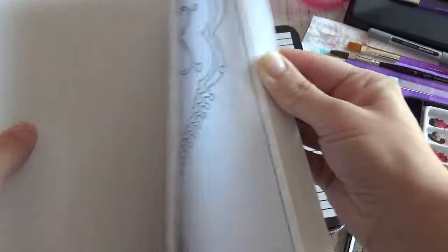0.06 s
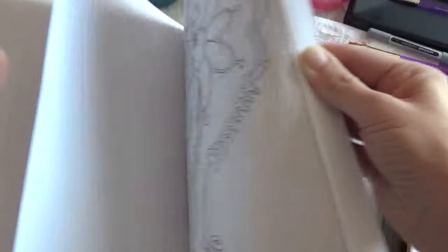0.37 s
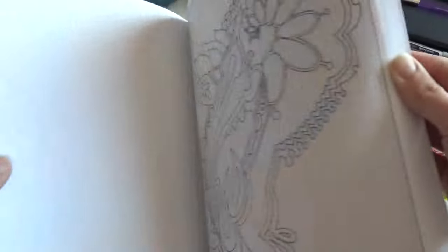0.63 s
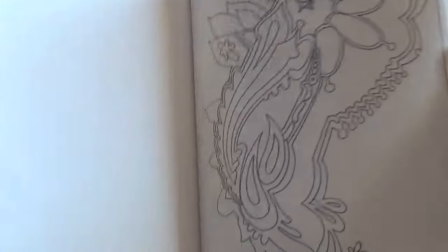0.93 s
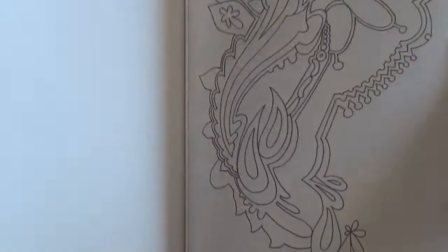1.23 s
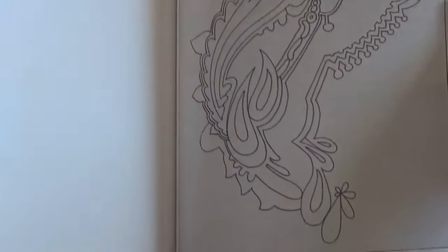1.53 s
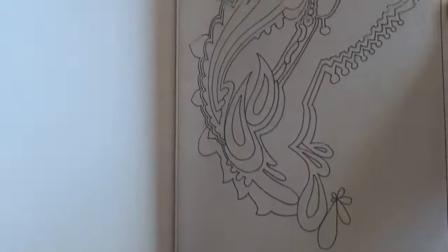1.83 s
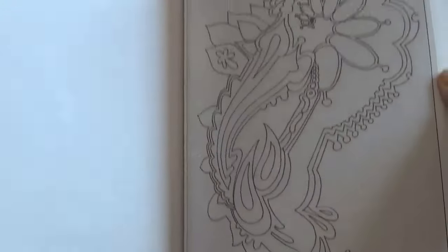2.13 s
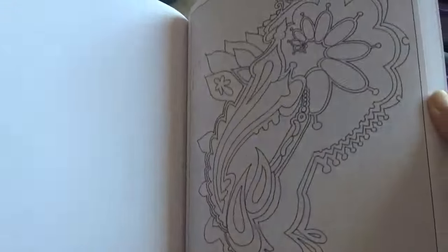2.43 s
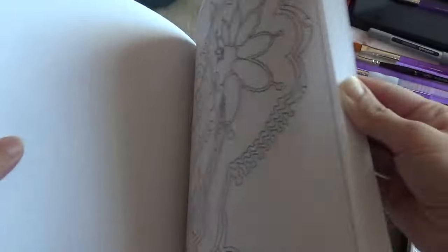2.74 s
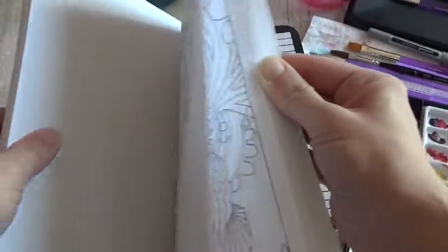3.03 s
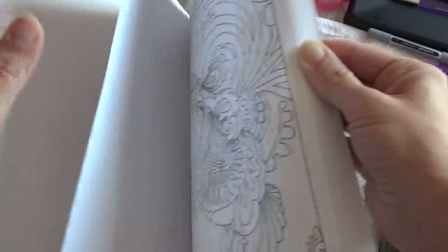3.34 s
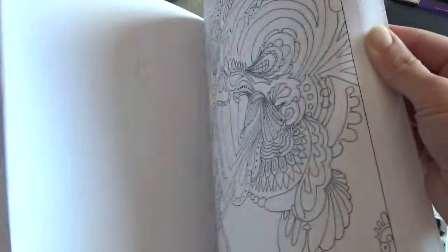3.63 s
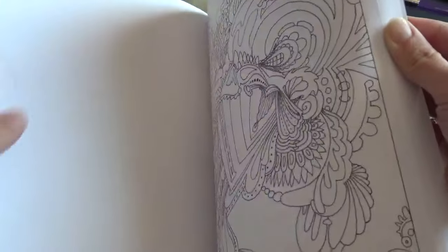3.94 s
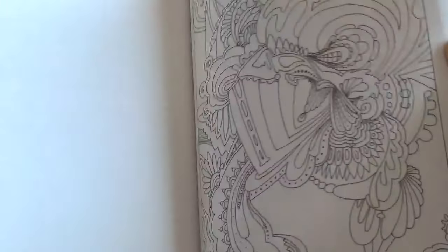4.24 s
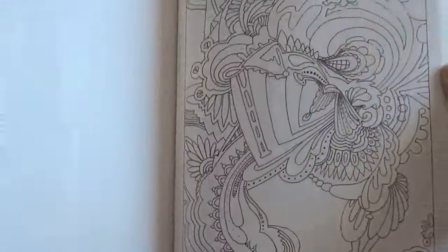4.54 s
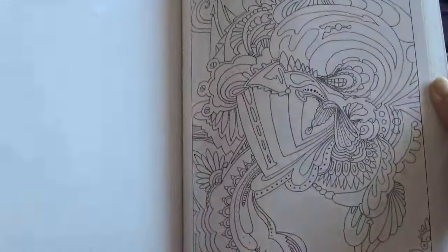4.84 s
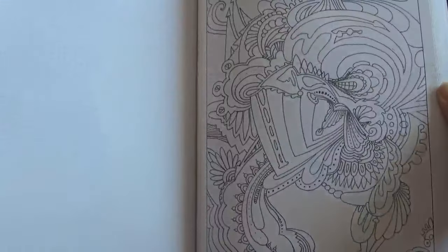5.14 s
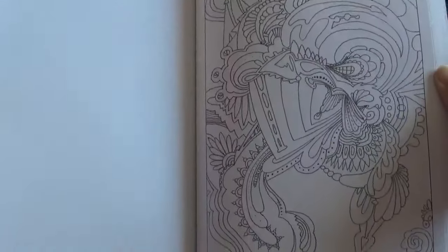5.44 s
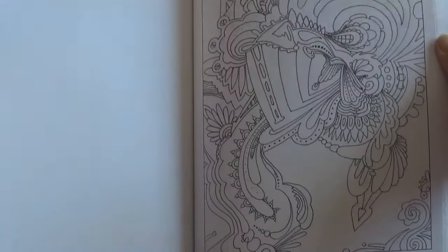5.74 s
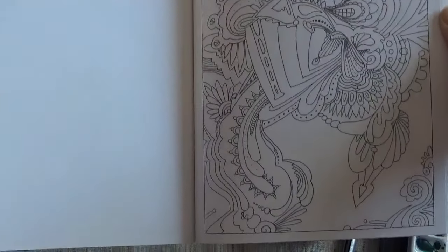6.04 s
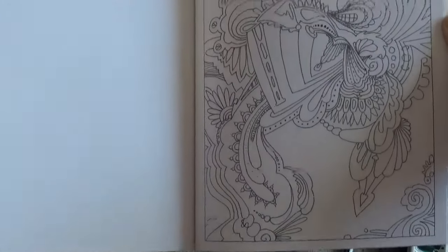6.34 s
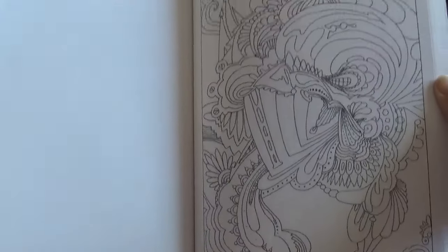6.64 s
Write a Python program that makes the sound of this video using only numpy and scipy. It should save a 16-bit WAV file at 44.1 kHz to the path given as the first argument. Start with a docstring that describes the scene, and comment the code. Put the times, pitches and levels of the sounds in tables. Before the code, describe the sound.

Two thick pages of a drawing book are turned by hand, close to the microphone in a small quiet room. A light brush leads into a sharp snap and brief rustle. After a pause come a soft tap and faint sliding, then the second page turns with a gentler snap and rustle, and settles. Low room hiss and a faint, rapid electrical chirping continue throughout.

```python
"""Turning the pages of a drawing book

Two thick pages are turned by hand, close to a phone in a small quiet room. Each sheet slips off the
thumb, buckles with a snap and slides over its neighbour, where friction excites a rustle; fingers brush
and tap the paper. Beneath lie room hiss and faint electrical interference, chirping 30 times a second."""
import sys
import numpy as np
from scipy import signal
from scipy.fft import rfft, irfft
from scipy.io import wavfile

SR = 44100
rng = np.random.default_rng(int(sys.argv[2]) if len(sys.argv) > 2 else 0)


def transcribe(signal):
    """Save signal, clipped to [-1, 1], as a 16-bit WAV file at the path in sys.argv[1]."""
    frames = np.atleast_2d(signal).T
    limited = np.clip(frames, -1, 1)
    pcm = np.round(limited * 32767).astype(np.int16)
    wavfile.write(sys.argv[1], SR, pcm)


N = 294588
TIME = np.arange(N) / SR
FREQ = np.maximum(np.arange(N // 2 + 1) * SR / N, 1)


def undb(db):
    """Amplitude ratio of a level in decibels."""
    return 10 ** (np.asarray(db) / 20)


def unit(x):
    """Normalisation to rms 1."""
    return x / np.sqrt(np.mean(x ** 2))


def spectrum(points):
    """Spectral envelope through (frequency_hz, level_db) points."""
    hz, db = np.transpose(points)
    return undb(np.interp(np.log(FREQ), np.log(hz), db))


def resonance(hz, width_hz):
    """Frequency response of a damped oscillator, gain 1 at its centre."""
    return 1 / (1 + 1j * (FREQ ** 2 - hz ** 2) / (FREQ * width_hz))


def noise(colour):
    """Filtered Gaussian noise of rms 1."""
    return unit(irfft(rfft(rng.standard_normal(N)) * colour, N))


def add(out, start_s, sound):
    """Superposition of a sound from a given time."""
    i = max(int(start_s * SR), 0)
    out[i:i + len(sound)] += sound[:max(N - i, 0)]


def envelope(attack_s, hold_until_s, release_s):
    """Linear rise, plateau and exponential decay."""
    t = TIME[:min(int((hold_until_s + 6 * release_s) * SR), 16000)]
    return np.minimum(t / attack_s, 1) * np.exp(-np.maximum(t - hold_until_s, 0) / release_s)


def glide(length_s, first_hz, last_hz):
    """A linear frequency sweep that swells and fades."""
    count = max(int(length_s * SR), 16)
    phase = 2 * np.pi * np.cumsum(np.linspace(first_hz, last_hz, count)) / SR
    return np.hanning(count) * np.sin(phase)


def ring(modes):
    """Free vibration: a sum of exponentially damped modes."""
    t = TIME[:SR // 5]
    return sum(undb(db - 60 * t / t60_s) * np.sin(2 * np.pi * hz * t) for hz, db, t60_s in modes)


# Spectrum of the room hiss: frequency_hz, gain_db
HISS_SPECTRUM = [(15, -4.5), (25, -5.5), (42, 1), (62, -5.5), (95, -1), (230, -2.5), (305, -2), (430, -7),
                 (1100, -11), (2000, -14), (3200, -14), (4400, -16), (11000, -20)]
# Stereo width of the hiss: frequency_hz, side_to_mid_db
HISS_WIDTH = [(30, -23), (70, -17.5), (180, -10.5), (340, -5.5), (600, 0), (1100, 1), (2000, 0), (3500, -2),
              (6500, -6.5), (11000, -9)]
# Whirring of something electric: centre_hz, width_hz, level_db
WHIR_BANDS = [(1446, 97, -77.5), (1302, 40, -83), (313, 27, -81)]

def room_hiss(mid_db=-64):
    """Broadband noise, partly coherent between the channels, with narrow bands of whirring."""
    colour = spectrum(HISS_SPECTRUM)
    side_colour = colour * spectrum(HISS_WIDTH)
    side = noise(side_colour) * np.linalg.norm(side_colour) / np.linalg.norm(colour)
    whir = sum(undb(db) * noise(resonance(hz, width_hz) ** 2) for hz, width_hz, db in WHIR_BANDS)
    return undb(mid_db) * (noise(colour) + np.array([side, -side])) + whir


# Course of the electronic buzz: time_s, pitch_hz, gain_db
BUZZ_COURSE = [(0, 890, -2.5), (0.3, 860, -4), (0.5, 875, -3), (0.72, 861, -0.5), (0.95, 928, -1),
               (1.22, 1122, 2.5), (1.42, 1118, -10), (2.12, 1116, -6), (2.36, 1340, -2), (2.62, 1365, 1.5),
               (2.85, 1256, -7), (3.0, 1090, 1), (3.25, 957, -1), (4.3, 970, 0), (4.52, 1124, 1),
               (4.66, 1290, -8), (4.85, 1356, -2.5), (6.68, 1338, -2.5)]
# Overtone level set by the casing's two resonances: frequency_hz, level_db
CASING_RESPONSE = [(1900, -85), (2340, -71), (2620, -56.5), (2730, -63), (2880, -68.5), (3060, -66),
                   (3320, -56), (3510, -71), (4200, -89)]
# Blips around each burst: pitch_hz, lag_s, sigma_s, level_db
BLIPS = [(2483, -0.0022, 0.00047, -63.5), (3283, -0.003, 0.002, -64.5), (3715, -0.0047, 0.0014, -68.5),
         (2835, 0.0031, 0.00066, -63)]

def interference(rate_hz=29.965, burst_sigma_s=0.003, scatter_db=0.7, detune=0.003, swing_db=1.5):
    """Pulse modulation: bursts of a buzz, its overtones gliding through casing resonances, amid blips."""
    times, pitches, gains = np.transpose(BUZZ_COURSE)
    pitch = np.interp(TIME, times, pitches)
    cycle = np.round(TIME * rate_hz).astype(int)
    offset_s = TIME - cycle / rate_hz
    polarity = (-1) ** cycle
    pitch_jitter, level_jitter, blip_phase = rng.standard_normal((cycle[-1] + 1, 3))[cycle].T
    phase = 2 * np.pi * pitch * (1 + detune * pitch_jitter) * offset_s
    casing_hz, casing_db = np.transpose(CASING_RESPONSE)
    buzz = sum(undb(np.interp(k * pitch, casing_hz, casing_db)) * np.sin(k * phase) for k in (2, 3))
    buzz *= np.exp(-0.5 * (offset_s / burst_sigma_s) ** 2)
    buzz *= undb(np.interp(TIME, times, gains) + scatter_db * level_jitter)
    blips = np.zeros(N)
    for hz, lag_s, sigma_s, db in BLIPS:
        window = np.exp(-0.5 * ((offset_s - lag_s) / sigma_s) ** 2)
        blips += undb(db) * window * np.sin(2 * np.pi * hz * offset_s + blip_phase)
    swing = undb(swing_db * polarity)  # favours buzz and blips in turn
    return polarity * (buzz / swing + blips * swing)


def reflections(source):
    """Reverberation: bright early reflections off the desk, then a dull tail from the walls."""
    channels = []
    for _ in range(2):
        response = 0
        for delay_s, t60_s, db, cutoff_hz in [(0.001, 0.09, -17, 7000), (0.008, 0.22, -14, 3300)]:
            decay = rng.standard_normal(N) * undb(-60 * TIME / t60_s) * (TIME > delay_s)
            response += undb(db) * rfft(decay) / np.linalg.norm(decay) / (1 + 1j * FREQ / cutoff_hz)
        channels.append(irfft(rfft(source) * response, N))
    return np.array(channels)


def friction(count, colour, rate_hz, spread_db):
    """Shot noise: catching fibres give random, unequal impulses, filtered and scaled to rms 1."""
    size = 16384
    strength = undb(spread_db * np.minimum(rng.exponential(size=size), 4))
    clicks = (rng.random(size) < rate_hz / SR) * rng.choice([-1, 1], size) * strength
    gain = np.interp(np.fft.rfftfreq(size, 1 / SR), FREQ, np.abs(colour))
    return unit(irfft(rfft(clicks) * gain)[:count])


# Radiation of the fibres: frequency_hz, gain_db
FIBRE_SPECTRUM = [(2000, -8), (5000, 2), (6400, -1), (7200, -2), (10200, -5), (11200, -11.5)]

def fibre_hiss(count, centre_hz):
    """Direct radiation from the fibres: a fine sizzle in a broad treble band."""
    band = np.abs(resonance(centre_hz, width_hz=4000)) ** 2
    return friction(count, spectrum(FIBRE_SPECTRUM) * band, rate_hz=3100, spread_db=1.7)


# Radiation of the sheet: frequency_hz, gain_db
SHEET_SPECTRUM = [(60, -38), (250, -14.5), (600, -9.5), (1000, -0.5), (1600, -1.5), (2500, 1.5), (3600, 0),
                  (4600, -1.5), (5400, -5.5), (11000, -22)]

def sheet_rustle(count, tilt_db, echo, echo_s=0.00043):
    """Forced vibration: catching fibres shake the sheet, bright when taut and dull when slack."""
    octaves = np.log2(np.clip(FREQ, 500, None) / 2000)
    comb = 1 + echo * np.exp(-2j * np.pi * FREQ * echo_s)  # reflection off the facing page
    colour = spectrum(SHEET_SPECTRUM) * undb(tilt_db * octaves) * comb
    return friction(count, colour, rate_hz=3700, spread_db=-1.5)


# The slack sheet comes to rest: start_s, level_db
SETTLINGS = [(0.514, -44), (2.722, -62.5), (3.609, -55), (4.019, -58.5)]

def settling():
    """Friction under a decaying pressure: a dull, dying rustle."""
    out = np.zeros(N)
    for start_s, db in SETTLINGS:
        pressure = envelope(attack_s=0.0025, hold_until_s=0.0025, release_s=0.035)
        add(out, start_s, undb(db) * pressure * sheet_rustle(len(pressure), tilt_db=-8.5, echo=0.072))
    return out


# Paper slides on paper or skin:
# start_s, length_s, swell_db, sheet_db, tilt_db_per_octave, fibre_db, fibre_hz, echo_ratio
SLIDES = [(0.018, 0.093, 11.5, -59.5, -2, -63, 8300, 0.34), (0.467, 0.022, 14, -40, -4, -55, 8500, 0.6),
          (0.483, 0.020, 16.5, -38.5, -2, -40, 8250, 0.1), (0.507, 0.0057, 5, -26.5, 0, -36, 6970, 0.05),
          (0.712, 0.053, -3, -61.5, -2, -67, 8700, 0), (2.86, 0.22, -1, -69.5, -6.5, -73, 8040, 0.4),
          (3.018, 0.048, 3, -65, 3, -72, 7800, 0.3), (3.081, 0.045, 3, -65, -1, -61, 8600, 0.3),
          (3.473, 0.039, -1, -44, -3, -46, 9600, 0), (3.514, 0.022, -1, -42, 3.5, -38.5, 8060, 0.2),
          (3.536, 0.016, -8, -43.5, 1, -51, 8900, 0.2), (3.556, 0.053, 0.5, -43.5, 0, -59, 9700, 0.27),
          (3.650, 0.026, -8.5, -46, 0.5, -47.5, 8150, 0.65),
          (4.151, 0.15, -4, -69.5, -10.5, -88, 8500, 0.2)]

def sliding():
    """Sliding friction: sheet and fibres sound together as the pressure swells or eases."""
    out = np.zeros(N)
    for start_s, length_s, swell_db, sheet_db, tilt_db, fibre_db, fibre_hz, echo in SLIDES:
        pressure = envelope(0.17 * length_s, length_s, release_s=0.0018 + 0.039 * length_s)
        count = len(pressure)
        progress = np.minimum(TIME[:count] / length_s, 1)
        pressure *= undb(swell_db * (progress - 0.5))
        sheet = undb(sheet_db) * sheet_rustle(count, tilt_db, echo)
        fibres = undb(fibre_db) * fibre_hiss(count, fibre_hz)
        add(out, start_s, pressure * (sheet + fibres))
    return out


# A page edge slips off the thumb: start_s, length_s, sheet_db, tilt_db_per_octave, fibre_db
EDGE_FLICKS = [(0.4584, 0.002, -39.5, -0.5, -54), (0.6867, 0.003, -52.5, 6.5, -54.5),
               (2.6845, 0.0036, -43, 0.5, -42), (3.4706, 0.0061, -34, 8.5, -39.5),
               (4.0175, 0.0027, -55, 6, -54.5)]

def flicks():
    """Transient friction: a pulse of pressure a few milliseconds long excites sheet and fibres."""
    out = np.zeros(N)
    for start_s, length_s, sheet_db, tilt_db, fibre_db in EDGE_FLICKS:
        pressure = envelope(attack_s=0.00037, hold_until_s=length_s, release_s=0.0013)
        sheet = undb(sheet_db) * sheet_rustle(len(pressure), tilt_db, echo=0.13)
        fibres = undb(fibre_db) * fibre_hiss(len(pressure), centre_hz=9600)
        add(out, start_s, pressure * (sheet + fibres))
    return out


# A finger or falling page lands on the block of pages: crest_s, pitch_hz, level_db
BLOCK_PATS = [(0.4644, 240, -40.5), (0.508, 650, -31.5), (2.6845, 501, -35), (3.486, 710, -41),
              (4.023, 503, -56)]
# Modes of the block, relative to the pat: pitch_ratio, gain_db, t60_s
BLOCK_MODES = [(1.2, -10.5, 0.06), (0.39, -16, 0.045)]

def pats(length_s=0.00609, rise=0.22):
    """Soft impact: the thud rises in pitch as air is squeezed from between the pages; the block rings."""
    out = np.zeros(N)
    for crest_s, hz, db in BLOCK_PATS:
        add(out, crest_s - length_s / 2, undb(db) * glide(length_s, hz * (1 - rise), hz * (1 + rise)))
        modes = [(ratio * hz, gain_db, t60_s) for ratio, gain_db, t60_s in BLOCK_MODES]
        add(out, crest_s, undb(db) * ring(modes))
    return out


# The paper catches and squeaks: crest_s, length_s, pitch_hz, level_db
PAPER_SQUEAKS = [(0.085, 0.033, 2650, -48), (0.475, 0.012, 1870, -34.5), (0.503, 0.010, 1510, -27.5),
                 (3.494, 0.017, 1132, -40.5)]

def squeaks(sag=0.054):
    """Stick-slip oscillation: friction turns briefly periodic, and the pitch sags as the sheet slows."""
    out = np.zeros(N)
    for crest_s, length_s, hz, db in PAPER_SQUEAKS:
        add(out, crest_s - length_s / 2, undb(db) * glide(length_s, hz * (1 + sag), hz * (1 - sag)))
    return out


# The sheet buckles: crest_s, first_hz, last_hz, level_db
BUCKLES = [(0.4836, 1590, 2980, -14), (0.4850, 3650, 4950, -10), (0.5077, 2860, 3300, -20),
           (0.5103, 2780, 3300, -13.5), (0.5128, 3200, 2460, -21), (3.4838, 1740, 2430, -21.5),
           (3.4872, 2280, 1780, -30)]
# Modes of the sheet, with gain relative to the snap: pitch_hz, gain_db, t60_s
SHEET_MODES = [(1634, -18, 0.03), (1185, -26.5, 0.065), (739, -26, 0.022)]

def snaps(length_s=0.0019):
    """Snap-through buckling: a bend flips, gliding in pitch as the tension changes; the sheet rings."""
    out = np.zeros(N)
    for crest_s, first_hz, last_hz, db in BUCKLES:
        add(out, crest_s - length_s / 2, undb(db) * glide(length_s, first_hz, last_hz))
        add(out, crest_s, undb(db) * ring(SHEET_MODES))
    return out


# Direction of the paper, heard as treble balance: time_s, left_minus_right_db
TREBLE_BALANCE = [(0, .9), (.5, 1.5), (2.68, -2.4), (3.05, 1), (3.47, .6), (3.67, 1)]

def shadowed(source, corner_hz=1000):
    """Acoustic shadow: the phone's body shades the far microphone, but only at short wavelengths."""
    treble = irfft(rfft(source) * FREQ ** 2 / (FREQ ** 2 + corner_hz ** 2), N)
    balance_db = np.interp(TIME, *np.transpose(TREBLE_BALANCE))
    gains = undb([balance_db / 2, -balance_db / 2])
    return source + treble * (gains - 1)


def scene():
    """Superposition of the background and the paper's reflected and direct sound, in stereo."""
    paper = sliding() + flicks() + settling() + pats() + squeaks() + snaps()
    return reflections(paper) + shadowed(paper) + interference() + room_hiss()


def record(dry, cutoff_hz=10950):
    """Band limiting: the phone's steep low-pass filter removes the top of the spectrum."""
    return signal.sosfilt(signal.ellip(10, 0.1, 70, cutoff_hz, fs=SR, output="sos"), dry)


dry = scene()
out = record(dry)
transcribe(out)
```